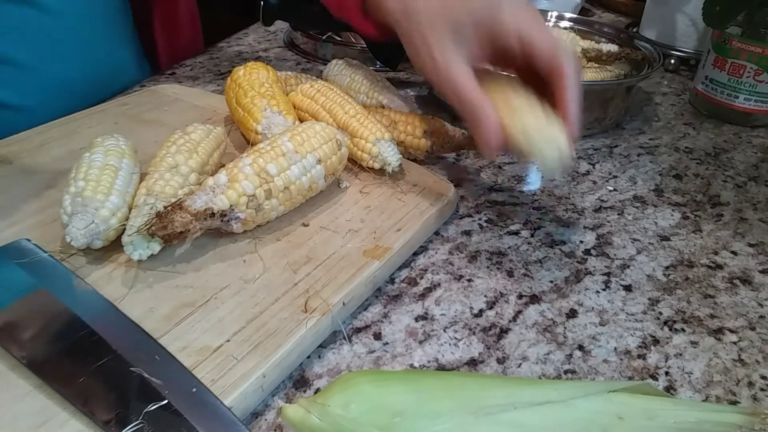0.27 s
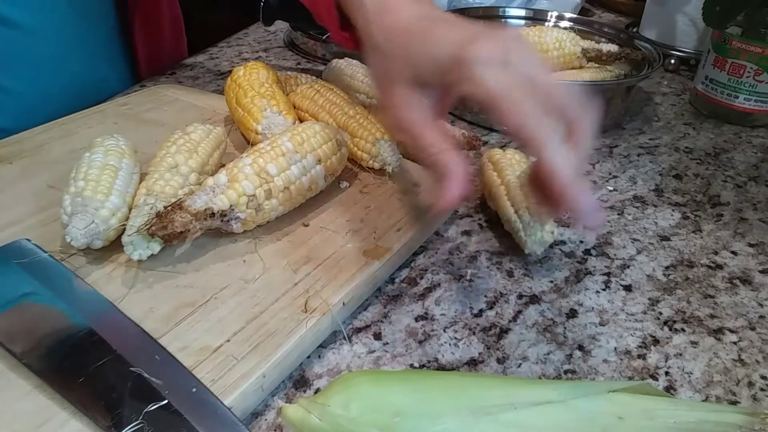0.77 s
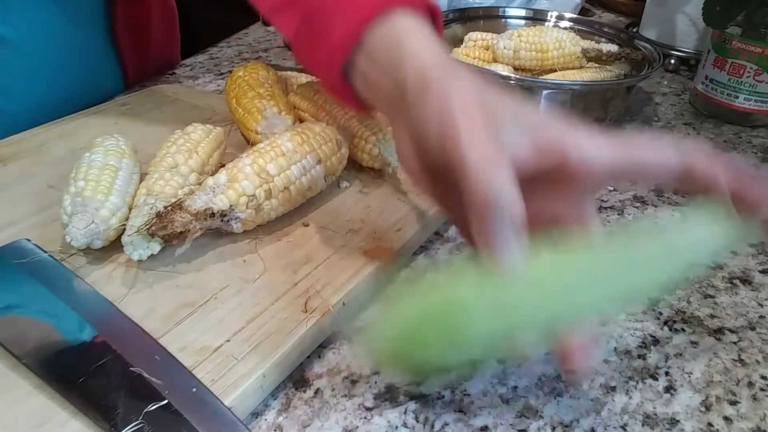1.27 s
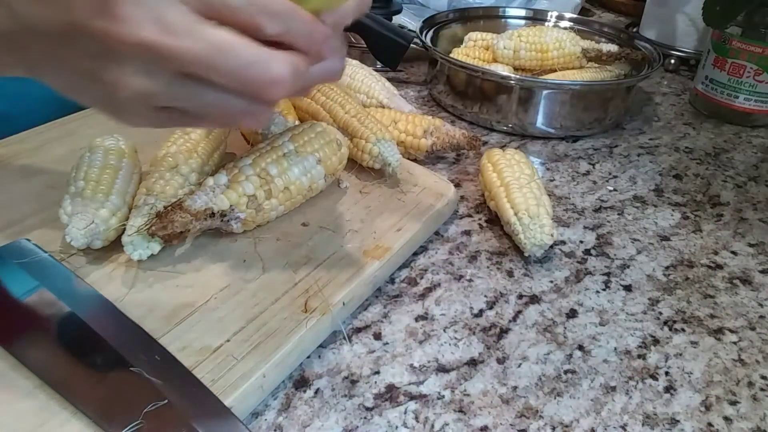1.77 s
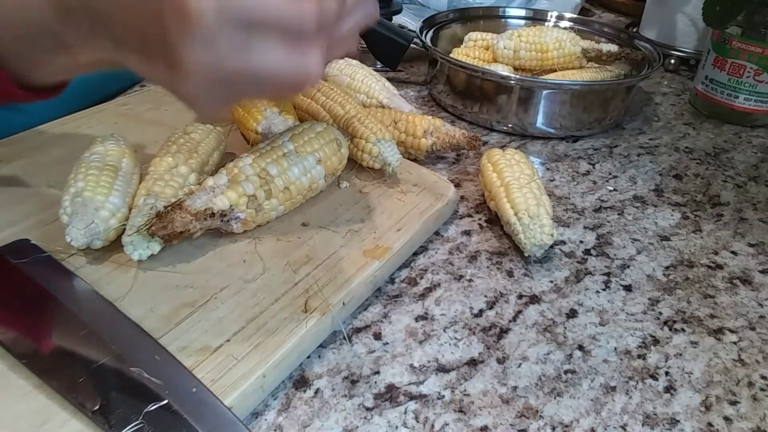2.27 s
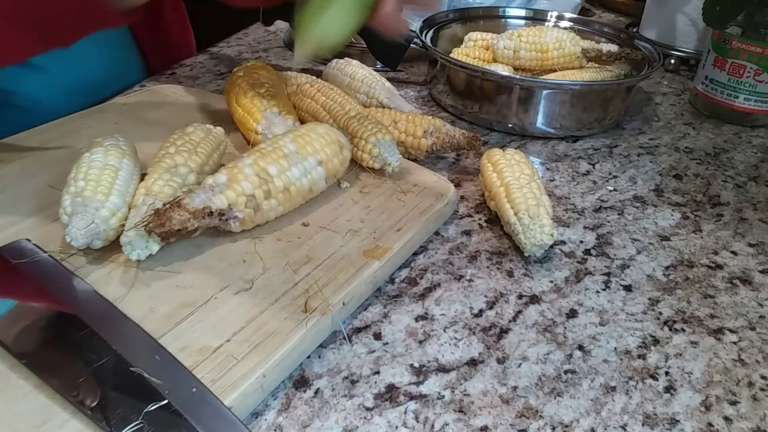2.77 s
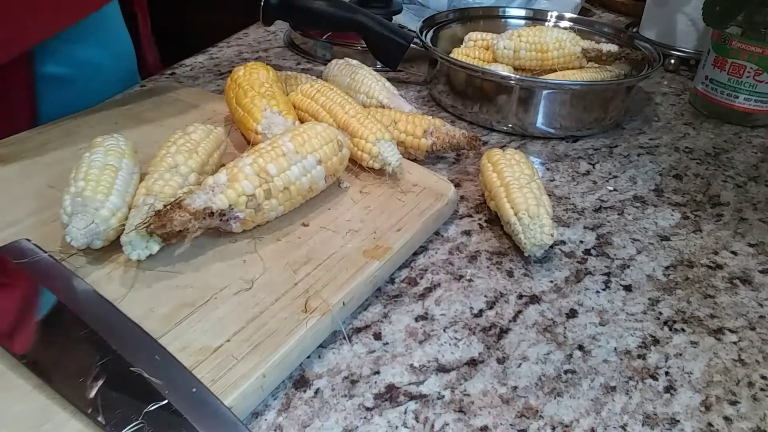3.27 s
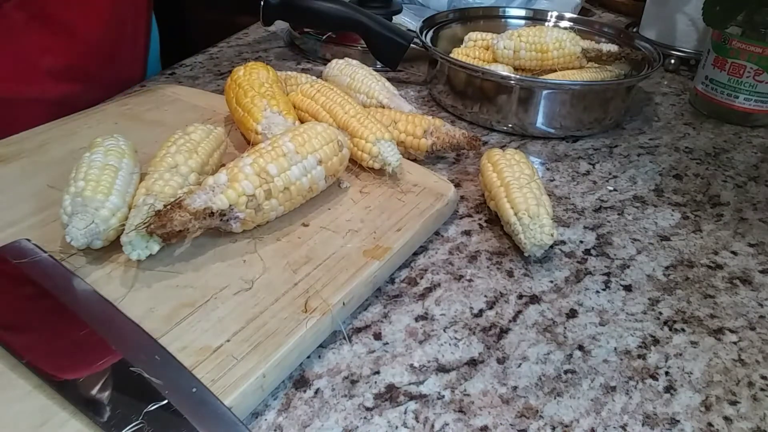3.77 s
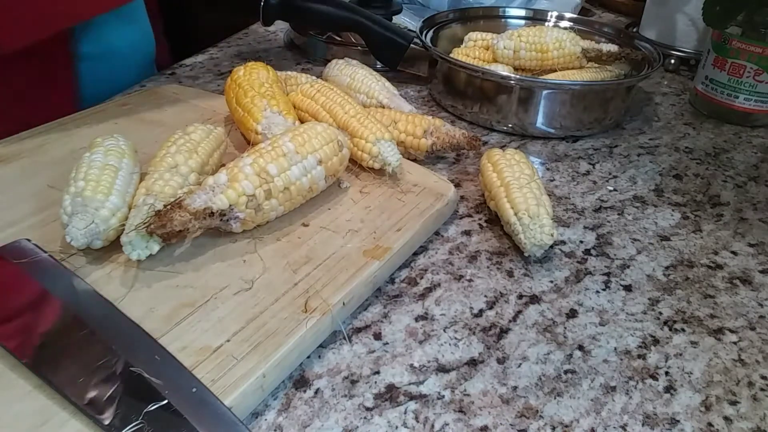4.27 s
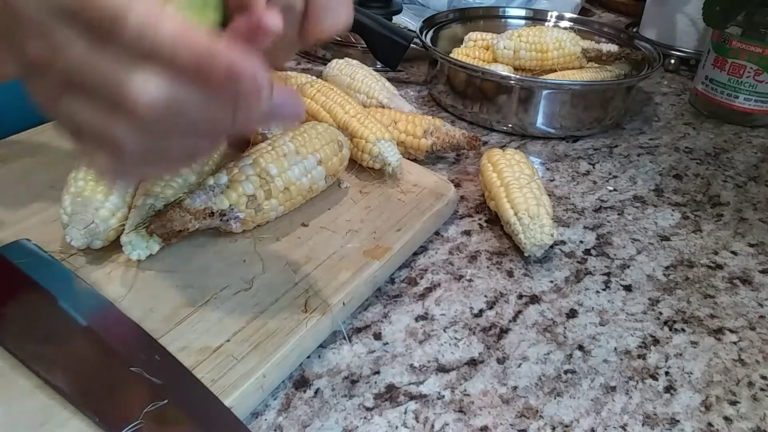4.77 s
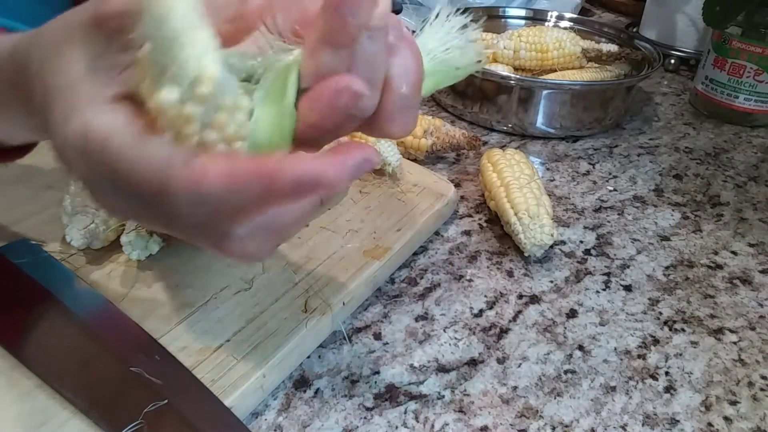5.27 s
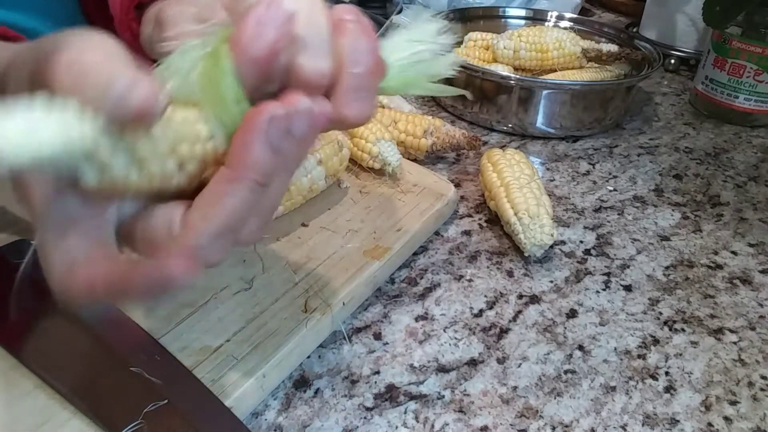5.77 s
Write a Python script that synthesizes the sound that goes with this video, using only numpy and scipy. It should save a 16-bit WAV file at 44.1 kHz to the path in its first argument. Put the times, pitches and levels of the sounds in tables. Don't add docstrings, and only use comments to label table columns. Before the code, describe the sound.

A close single microphone in a hard-walled kitchen, with a faint, steady low appliance hum and slight hiss throughout. From 0 to 1.9 seconds there are only faint leaf rustles and sparse tiny snaps, a little busier around 1 to 1.7. Around 1.9 to 2.35 the outer husk begins to rip: grainy fibre crackle, a cluster of bright ticks and a strong snap near 2.3. It eases, then a harder, bushier tear runs from 2.75 to 3.1, with sharp cracks and a dull shake of the cob. From 3.2 to 4.2 it is nearly quiet, with one small snap or two. Snaps return at 4.3; crisp rips hit at 4.75, 4.9 and, loudest, 5.14. Rapid ticks at 5.25 lead into uneven, squeaky stick-slip creaks from 5.35 to 5.63, amid tearing. Small crackles fade towards 6 seconds. Counter and wall echoes briefly follow each sound.

```python
import sys
import numpy as np
from scipy import signal
from scipy.fft import rfft, irfft, next_fast_len
from scipy.io import wavfile
from scipy.ndimage import uniform_filter1d, map_coordinates

SR = 44100
rng = np.random.default_rng(int(sys.argv[2]) if len(sys.argv) > 2 else 0)


def log_audio(samples):
    frames = np.atleast_2d(samples).T
    limited = np.clip(frames, -1, 1)
    pcm = np.round(limited * 32767).astype(np.int16)
    wavfile.write(sys.argv[1], SR, pcm)


def magnitude_from_level(level_db):
    exponent = np.asarray(level_db, float) / 20
    return 10 ** exponent


N = 265305

# pitch in Hz, level in dB per Hz.
LEAF_COLOUR = [(88, -71), (150, -11.5), (393, -6), (723, -2), (830, -3), (991, -9.5), (1070, -5),
               (1930, -2.5), (4250, 0), (5480, -9), (7080, -5.5), (13300, -14), (15600, -18.5),
               (16500, -52)]
# time in seconds, slips per second, peak in dB.
CREAK_PATHS = [
    [(5.343, 270, -30), (5.36, 270, -21)],
    [(5.384, 190, -18), (5.425, 210, -17), (5.44, 135, -18), (5.46, 235, -20), (5.478, 310, -21),
     (5.5, 220, -27), (5.532, 260, -26)],
    [(5.549, 125, -23), (5.569, 150, -17), (5.58, 210, -17), (5.61, 225, -18), (5.634, 290, -28)],
]


def unit(x):
    return x / np.sqrt(np.mean(x ** 2) + 1e-20)


def along(points, hz):
    f, v = np.transpose(points)
    return np.interp(np.log(hz + 1), np.log(f + 1), v)


def wobble(rate):
    knots = rng.standard_normal(int(N * rate / SR) + 4)
    return map_coordinates(knots, [np.arange(N) * rate / SR])


def coloured(x, spectrum):
    gain = magnitude_from_level(along(spectrum, np.fft.rfftfreq(4096, 1 / SR)))
    cepstrum = irfft(np.log(gain + 1e-6))
    cepstrum[1:2048] *= 2
    cepstrum[2049:] = 0
    return signal.fftconvolve(x, irfft(np.exp(rfft(cepstrum))))[:N]


def zones(x):
    borders = [1250, 2950, 5600]
    size = next_fast_len(len(x))
    hz = np.fft.rfftfreq(size, 1 / SR)
    below = [1 / (1 + (hz / border) ** 6) for border in borders]
    shares = [below[0], below[1] - below[0], below[2] - below[1], 1 - below[2]]
    return irfft(rfft(x, size) * shares, size)[:, :len(x)]


def patchy(depth_db):
    z = signal.stft(rng.standard_normal(N + 512), nperseg=256)[2]
    field = uniform_filter1d(rng.standard_normal(z.shape), size=5, axis=0)
    field = uniform_filter1d(field, size=4, axis=1)
    return unit(signal.istft(z * magnitude_from_level(depth_db * unit(field)), nperseg=256)[1][:N])


def swell_db(t, peak_s, rise_s, fall_s, peak_db):
    return peak_db - 30 * np.where(t < peak_s, (peak_s - t) / rise_s, (t - peak_s) / fall_s)


def hum():
    # pitch in Hz, level in dB per Hz.
    hum_colour = [(15, -58), (25, -37), (92, -30), (150, -10), (245, -10.5), (266, -5.5), (313, -3.5),
                  (584, -7), (1010, -9), (1090, -9.5), (1180, -13), (1930, -18), (5420, -35.5),
                  (14800, -30.5), (16500, -58)]
    return magnitude_from_level(-58.5 + .6 * wobble(1)) * unit(coloured(patchy(depth_db=0.3), hum_colour))


def strokes():
    # start in seconds, length in seconds,
    # strength in dB, taut leaf in dB, thin fibres in dB.
    rustles = [(-.03, 0.3, -71.5, 0.5, -15), (.27, 0.57, -74.5, 1, -24), (0.92, 0.37, -54.5, 0, 0.5),
               (1.502, 0.11, -51, -4.5, 2), (1.656, 0.2, -74, 8.5, 12), (1.928, 0.24, -66, -6, 8),
               (2.166, 0.13, -50, 0, 4), (2.357, 0.24, -66.5, -1, 5.5), (2.623, 0.1, -54.5, -2.5, 12.5),
               (2.663, 0.17, -47.5, -14, 0), (2.806, 0.091, -41.5, -1, 4), (2.918, 0.19, -39, 3.5, 5),
               (3.186, 0.62, -74, 7.5, 7), (3.753, 0.35, -78.5, 4.5, -3.5), (4.092, 0.18, -65.5, -0.5, 1),
               (4.367, 0.42, -61, -3.5, -2), (4.747, 0.077, -53.5, 3.5, 0), (5.023, 0.16, -49.5, -13, 2),
               (5.208, 0.12, -42.5, 1, -7), (5.426, 0.19, -43.5, 7.5, 5), (5.593, 0.03, -47, 3, -13),
               (5.736, 0.17, -67.5, -5, -10)]
    # peak time in seconds, rise in seconds, fall in seconds,
    # peak in dB, thin fibres in dB.
    rips = [(.102, 0.039, 0.2, -66, 5.5), (1.21, 0.32, 0.22, -51, 5.5), (1.336, 0.065, 0.16, -51.5, 9),
            (1.95, 0.014, 0.058, -39, -3), (2.123, 0.011, 0.079, -41, 3.5), (2.268, 0.054, 0.042, -37, 9.5),
            (2.305, 0.041, 0.15, -35, 6), (2.51, 0.072, 0.064, -50, 3.5), (2.771, 0.062, 0.06, -32, -1.5),
            (2.957, 0.055, 0.086, -27.5, 1), (2.995, 0.018, .05, -34, 3), (3.033, 0.036, 0.07, -34, 13),
            (3.06, 0.13, 0.087, -31, 9.5), (3.713, 0.044, 0.056, -52, 1), (4.315, 0.085, 0.22, -50.5, 1.5),
            (4.373, 0.046, 0.034, -42.5, -24), (4.741, 0.0033, 0.064, -35.5, -2),
            (4.889, 0.014, 0.07, -23, -6), (4.912, 0.047, 0.038, -27.5, 2),
            (5.137, 0.021, 0.059, -19.5, -11), (5.146, 0.04, 0.1, -24, -2), (5.29, 0.072, 0.076, -40.5, 12),
            (5.372, 0.073, 0.12, -40, 2), (5.394, 0.062, 0.15, -19, -4), (5.577, 0.034, 0.067, -26.5, -1),
            (5.67, 0.022, 0.078, -39.5, 2)]
    grip_s, let_go_db_per_s = .035, 226
    t = np.arange(0, N + 32, 32) / SR
    moves = []
    for start, length, db, taut_db, thin_db in rustles:
        rise_db = 20 * np.log10(np.clip((t - start) / grip_s, 1e-4, 1))
        fall_db = let_go_db_per_s * np.clip(t - start - length, 0, None)
        moves.append((db + rise_db - fall_db, db, taut_db, thin_db))
    for peak, rise, fall, db, thin_db in rips:
        taut_db = -2.5 + 0.22 * thin_db
        moves.append((swell_db(t, peak, rise, fall, db), db, taut_db, thin_db))
    return t, moves


def breaks(count, cycles, scatter_db, clump_db):
    when, pitch, size, phase = rng.random((count, 4)).T
    start = (when * N).astype(int)
    hz = 300 + 16000 * pitch ** 1.5
    gain = magnitude_from_level(-scatter_db * np.log(size + .01) + clump_db * wobble(70)[start])
    gain *= hz ** .75
    hz, gain, phase = hz[:, None], gain[:, None], phase[:, None]
    t = np.arange(96) / SR
    grains = gain * np.exp(-t * hz / cycles) * np.sin(2 * np.pi * (hz * t + phase / 2))
    places = start[:, None] + np.arange(96)
    return unit(np.bincount(places.ravel(), grains.ravel(), N + 96)[:N])


def tearing():
    t, moves = strokes()
    power = 0
    for curve_db, db, taut_db, thin_db in moves:
        thick_db = -1 - 0.42 * (db + 53)
        balance_db = np.array([[thick_db], [0], [taut_db], [thin_db]])
        power = power + magnitude_from_level(2 * (curve_db + balance_db))
    swarm = breaks(count=30000, cycles=1.66, scatter_db=2.4, clump_db=1.8)
    rub = magnitude_from_level(1.54 * wobble(40)) * patchy(depth_db=3)
    layers = zones(coloured(swarm + magnitude_from_level(-2) * rub, LEAF_COLOUR))
    seconds = np.arange(N) / SR
    torn = sum(np.interp(seconds, t, np.sqrt(p)) * unit(layer) for p, layer in zip(power, layers))
    jerks = magnitude_from_level(-2.5 + 1.2 * wobble(25))
    return jerks * torn


def snaps():
    # time in seconds, peak in dB, leaf pitch in Hz, crack in dB.
    clean = [(0.5967, -42.5, 3780, -10), (.6853, -50, 1450, -18), (.9216, -43, 1750, -4),
             (0.942, -33, 1660, -18), (1.6357, -24.5, 1610, 0), (2.1225, -28, 5300, -17),
             (2.216, -21, 1580, -9), (2.2682, -26, 4700, -10), (2.3034, -8, 4170, -35),
             (2.4742, -34.5, 3320, -7), (3.709, -40, 2660, -18), (4.3139, -18.5, 2760, -9),
             (4.373, -14, 1910, -19), (4.8782, -30, 2300, -4), (4.8834, -14, 3050, -12),
             (5.0726, -20, 3480, -18), (5.097, -29, 4100, -4), (5.1327, -4.5, 3000, -36),
             (5.32, -17.5, 4430, -14), (5.348, -18, 4700, -14), (5.5328, -16.5, 3770, -4),
             (5.867, -33, 1860, -16), (4.6947, -24, 1930, -4), (0.959, -33, 3870, -5.5),
             (5.879, -27, 2970, -5.5)]
    frayed = [(1.1503, -31, 3380, -24), (1.3448, -31, 3530, -4), (1.379, -35, 2580, -4),
              (1.558, -26, 2360, -19), (1.7358, -42, 2070, -8), (2.165, -33, 3920, -10),
              (2.2394, -25, 3960, -4), (2.3057, -24, 3380, -4), (2.5, -31, 2350, -19),
              (2.6594, -29, 4040, -12), (2.81, -21, 2900, -12), (2.8413, -20, 3820, -3.5),
              (2.9452, -16, 3020, -14), (3.095, -20.5, 4600, -4), (3.638, -38.5, 3780, -20),
              (4.2226, -37.5, 1410, -5.5), (4.28, -39, 2790, -4), (4.359, -23, 2290, -18),
              (4.558, -30, 3320, -8), (4.639, -32, 1900, -15), (5.248, -18.5, 3700, -14),
              (5.3675, -15, 3400, -4), (5.5745, -15, 2080, -6.5), (5.576, -33, 3800, -4),
              (5.664, -20, 4400, -4), (5.9401, -31, 2860, -4), (5.933, -40, 4500, -4)]
    tense = [(.0836, -40, 3970, -5), (0.986, -29.5, 4340, -12.5), (1.5158, -33.5, 2220, -4),
             (1.9498, -27, 2710, -8), (2.1198, -26.5, 4210, -19), (2.745, -27, 2120, -8),
             (2.7723, -9, 2690, -35), (2.9924, -14, 3020, -22), (3.0107, -11.5, 4960, -2),
             (3.029, -8, 3010, -18), (4.7417, -16, 1840, -11.5), (4.8302, -30, 2300, -13),
             (5.03, -41, 3420, -5), (5.047, -30, 3720, -21), (5.1418, -5, 4580, -35),
             (5.137, -12, 987, -35), (5.15, -16.5, 1016, -35), (5.386, -21.5, 1050, -30),
             (.09, -50, 3000, -20), (.1, -44, 4600, -20), (4.873, -31, 4270, -2), (3.04, -14, 663, -36.5),
             (2.308, -13, 1790, -30)]
    # time for the ring to fall 60 dB in seconds, after-crackle in dB.
    kinds = [
        (0.0097, -2),
        (0.0097, 13.5),
        (0.022, -3),
    ]
    rings, cracks = np.zeros(N + SR), np.zeros(N + SR)
    t = np.arange(SR // 10) / SR
    for rows, (ring_s, after_db) in zip([clean, frayed, tense], kinds):
        for s, db, hz, crack_db in rows:
            noise = rng.standard_normal((3, len(t)))
            drift = np.cumsum(uniform_filter1d(noise[0], size=20)) * hz / 14000
            ring = np.sin(2 * np.pi * hz * t + drift) * magnitude_from_level(-60 * t / ring_s) * np.minimum(1, t * hz)
            crack = np.tanh(noise[1]) * magnitude_from_level(-60 * t / .006)
            loose = noise[2] * np.abs(noise[0]) * magnitude_from_level(-60 * t / 0.066) * (1 - np.exp(-t / 0.0019))
            burst = magnitude_from_level(min(crack_db, -4) + 19.0) * crack + magnitude_from_level(after_db - 17.0) * loose
            place = round(s * SR)
            rings[place:place + len(t)] += magnitude_from_level(db - 6) * ring
            cracks[place:place + len(t)] += magnitude_from_level(db) * burst
    thick, torn, taut, thin = zones(coloured(cracks[:N], LEAF_COLOUR))
    return rings[:N] + magnitude_from_level(-24.0) * thick + magnitude_from_level(-7.5) * (torn + taut) + thin


def ticks():
    # time in seconds, peak in dB,
    # leaf pitch in Hz, crack in dB.
    dry_fibres = [(0.5414, -55, 2060, -11), (0.962, -29.5, 3830, -13), (1.062, -32, 2410, -13),
                  (1.6136, -33, 7060, 0), (1.6744, -39, 11110, -3), (2.0454, -36, 10420, -3),
                  (2.194, -36, 3780, -2), (2.201, -30, 6710, -2), (2.2077, -24, 7230, 0),
                  (2.2234, -20, 3700, -3), (2.2441, -17.5, 7060, -1), (2.2747, -12, 6890, -5),
                  (2.2935, -20, 3900, -11), (2.3101, -14.5, 3840, -7), (2.3265, -22, 3870, -7),
                  (2.9912, -16, 2730, -5), (3.005, -8.5, 9850, -3), (3.0084, -12, 4130, -3),
                  (3.0466, -8.5, 4560, -5),
                  (4.2701, -37, 6630, -2), (4.3793, -28.5, 1980, -10), (4.5614, -26, 3350, -3),
             (4.5842, -37, 2750, -9), (4.656, -37, 6710, -3), (4.6747, -33, 4390, -5),
             (4.7199, -31, 3270, -6), (4.767, -31, 3870, -1), (4.7771, -31, 1890, -10),
             (4.7867, -30, 2150, -9), (4.8103, -25, 3780, -2), (4.8203, -36, 2320, -9),
             (4.8737, -30, 4350, -3), (4.8834, -18, 2110, -5), (4.8873, -26, 3960, -10),
             (4.8934, -24.5, 2000, -8), (4.8998, -24, 1800, -2), (4.9063, -17.5, 3270, -7),
             (4.9106, -17.5, 6890, 4), (4.9153, -19, 2970, -10), (4.919, -21, 4040, 1),
             (4.9245, -20, 3150, -6), (4.931, -28, 4220, -5), (4.942, -26, 3700, -8),
             (4.9446, -35, 3610, -6), (5.0864, -30, 2060, -1), (5.1143, -19, 2670, 6),
             (5.2555, -18.5, 3780, -9), (5.2617, -20.5, 6800, -6), (5.2671, -20, 11020, 0),
             (5.2708, -19, 4300, -1), (5.2866, -16.5, 6800, 0), (5.292, -16, 10680, -3),
             (5.3676, -12, 4470, -1.5), (5.6413, -27, 1980, -7), (5.7125, -23, 3870, -5),
             (5.9437, -28, 4700, -7),
                  (.9865, -33, 3500, -1), (1.0612, -32, 2500, -5), (1.345, -30, 6500, 0),
              (1.9324, -45, 7000, 3), (2.2392, -21, 7000, 0), (2.835, -28, 7000, 0), (2.8885, -24, 8000, 0),
              (2.967, -19, 3500, -3), (3.0805, -14, 9500, 0), (3.0953, -8, 7830, 2), (4.662, -38, 9000, 3),
              (4.971, -35, 8000, 3), (5.0731, -24, 3530, 0), (5.535, -19, 9380, 2), (5.6658, -19, 10000, 2),
              (5.6825, -29, 7500, 0), (5.6867, -27, 2150, -3)]
    leaf_s, crack_s = .0045, .0035
    out, t = np.zeros(N + SR), np.arange(SR // 50) / SR
    for s, db, hz, crack_db in dry_fibres:
        noise = np.tanh(rng.standard_normal(len(t) + 3))
        bright = noise[3:] - noise[:-3]
        crack = bright * magnitude_from_level(crack_db + 3 - 60 * t / crack_s)
        tick = np.sin(2 * np.pi * hz * t) * magnitude_from_level(-60 * t / leaf_s) + crack
        place = round(s * SR)
        out[place:place + len(t)] += magnitude_from_level(db + 1) * tick / np.abs(tick).max()
    return out[:N]


def cob():
    # pitch in Hz, level in dB per Hz.
    cob_colour = [(150, -41), (280, 0), (650, 2), (1000, -18), (1500, -45)]
    # peak time in seconds, rise in seconds, fall in seconds, peak in dB.
    tugs = [
        (2.955, .02, 0.085, -45),
        (3.033, 0.051, 0.16, -47),
        (5.39, .03, .1, -51),
    ]
    t = np.arange(N) / SR
    pulls = sum(magnitude_from_level(swell_db(t, *tug)) for tug in tugs)
    return pulls * unit(coloured(patchy(depth_db=0), cob_colour))


def held():
    # start in seconds, end in seconds.
    rippling = [
        (4.883, 4.935),
        (5.25, 5.295),
    ]
    t = np.arange(N) / SR
    spans = rippling + [(rows[0][0], rows[-1][0]) for rows in CREAK_PATHS]
    slipping = sum((t > start) & (t < end) for start, end in spans)
    return magnitude_from_level(-11 * uniform_filter1d(slipping * 1., size=300))


def creak():
    # pitch in Hz, level in dB, time to fall 60 dB in seconds.
    modes = [(2300, -6, .004), (3500, 0, .005), (4500, -1, .005), (6900, -6, .003), (9500, -11, .003),
             (11500, -14, .0025)]
    detune, scatter_db = .05, 2.5
    slack_fades_db = 10
    out, t = np.zeros(N + SR), np.arange(SR // 100) / SR
    hz, mode_db, t60 = np.transpose(modes)[:, :, None]
    for rows in CREAK_PATHS:
        s, rate, db = np.transpose(rows)
        now = np.arange(round(s[0] * SR), round(s[-1] * SR))
        uneven = np.interp(now / SR, s, rate) * magnitude_from_level(.6 * wobble(150)[now])
        slips = np.floor(np.cumsum(uneven) / SR)
        for jump in now[np.diff(slips, prepend=-1) > 0]:
            shape, strength = rng.standard_normal((2, len(modes), 1))
            level_db = mode_db + scatter_db * strength
            level_db[0] += slack_fades_db * (.5 - (jump - now[0]) / len(now))
            tones = np.sin(2 * np.pi * hz * (1 + detune * shape) * t)
            click = np.sum(magnitude_from_level(level_db - 60 * t / t60) * tones, axis=0)
            click *= 1 - np.exp(-(t / .0002) ** 2)
            peak_db = np.interp(jump / SR, s, db) + rng.normal(3.5, 1.5)
            out[jump:jump + len(t)] += magnitude_from_level(peak_db) * click / np.abs(click).max()
    return out[:N]


def kitchen(x):
    # pitch in Hz, time to fall 60 dB in seconds.
    fading = [(300, 1), (2000, 0.55), (5000, 0.53), (11000, 0.39), (16000, 0.24)]
    out, piece = np.zeros(N + SR), SR // 4
    for start in range(0, N, piece):
        hz, t, z = signal.stft(rng.standard_normal(SR // 2), SR, nperseg=256)
        decay = magnitude_from_level(-60 * t / along(fading, hz)[:, None])
        tail = signal.istft(z * decay, SR, nperseg=256)[1]
        tail *= 1 - np.exp(-np.arange(len(tail)) / SR / 0.00084)
        wet = signal.fftconvolve(x[start:start + piece], tail / np.linalg.norm(tail))
        out[start:start + len(wet)] += wet
    return out[:N]


def scene():
    # delay in seconds, level in dB.
    counter = (.002, -5)
    # pitch in Hz, microphone gain in dB.
    microphone = [(20, -45), (100, -22), (200, -3), (15600, -3), (16200, -26), (22000, -41)]
    delay_s, echo_db = counter
    clicks = snaps() + ticks() + creak()
    echo = magnitude_from_level(echo_db) * np.roll(clicks, round(delay_s * SR))
    husk = held() * tearing() + cob() + clicks + echo
    husk = coloured(husk + magnitude_from_level(-11) * kitchen(husk), microphone)
    return np.array([husk + hum()] * 2)


def top_cut(x):
    return signal.sosfilt(signal.butter(12, 16820, fs=SR, output="sos"), x)


def record(dry):
    return top_cut(dry)


dry = scene()
out = record(dry)
log_audio(out)
```